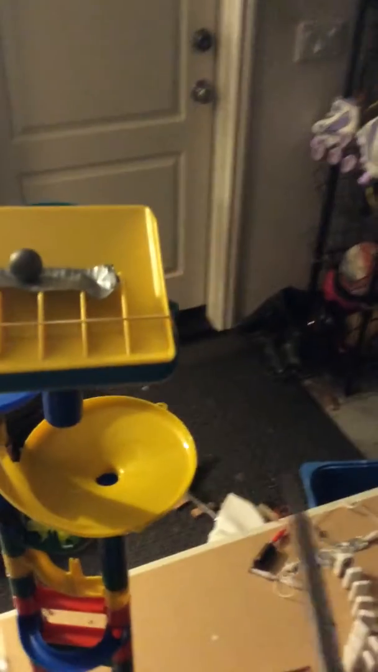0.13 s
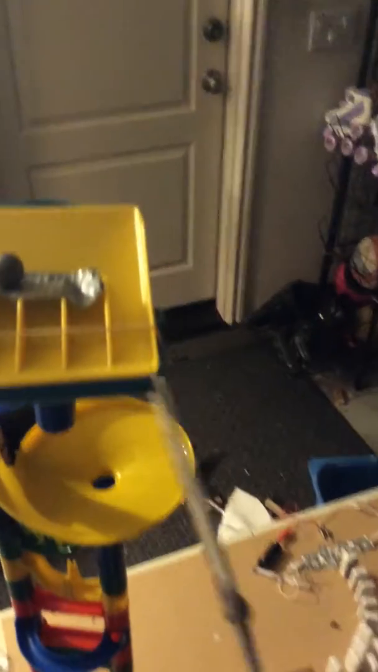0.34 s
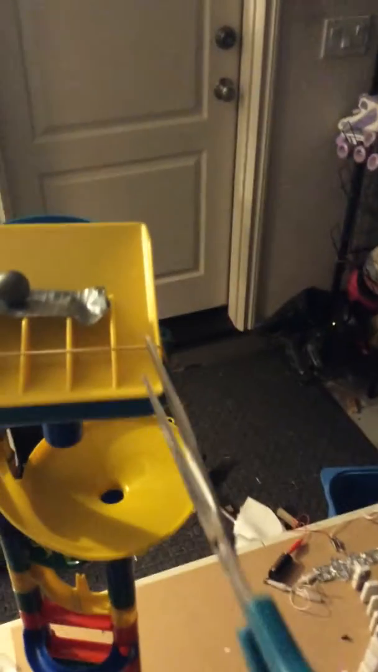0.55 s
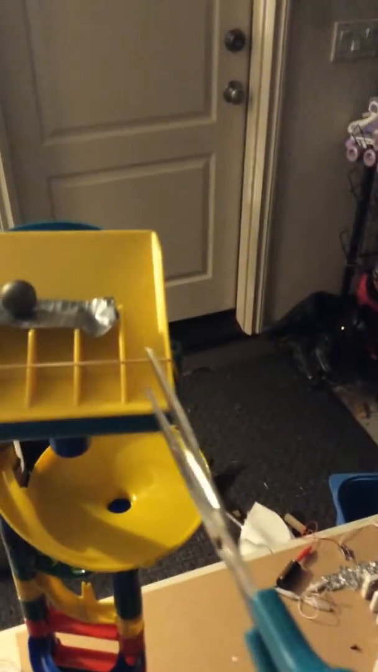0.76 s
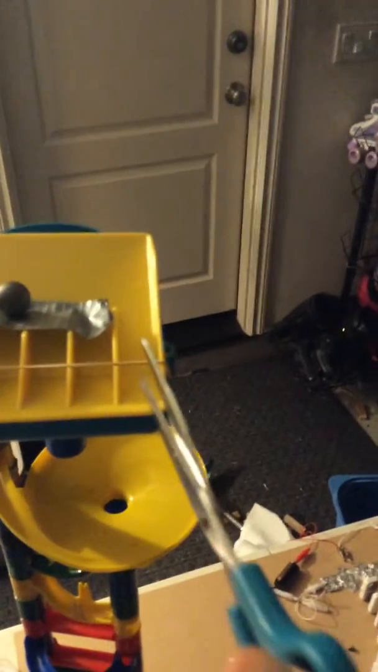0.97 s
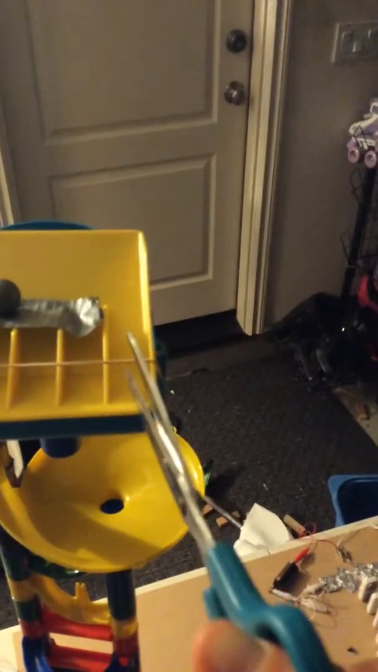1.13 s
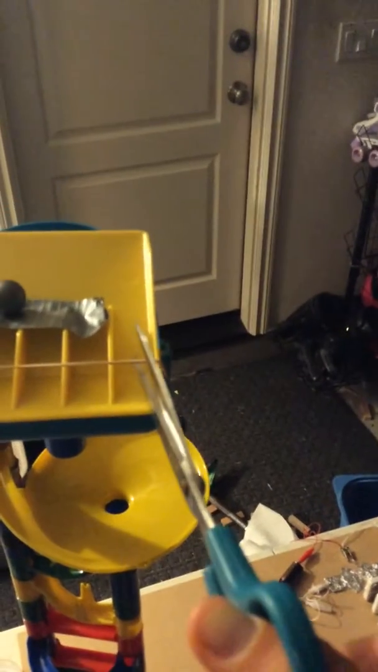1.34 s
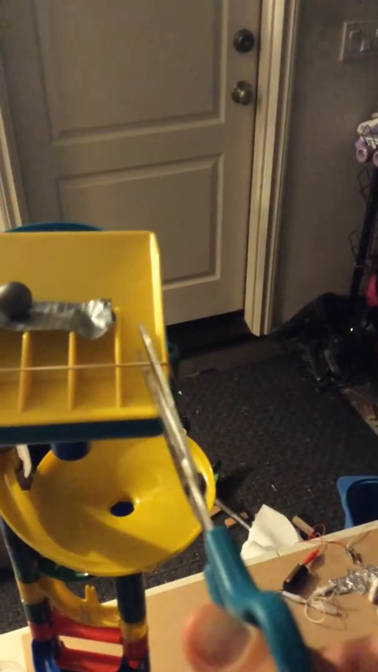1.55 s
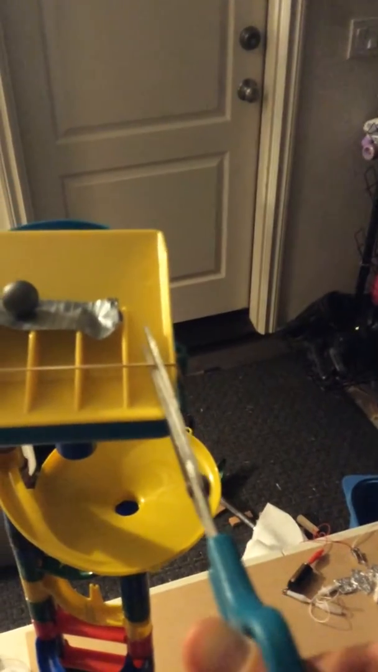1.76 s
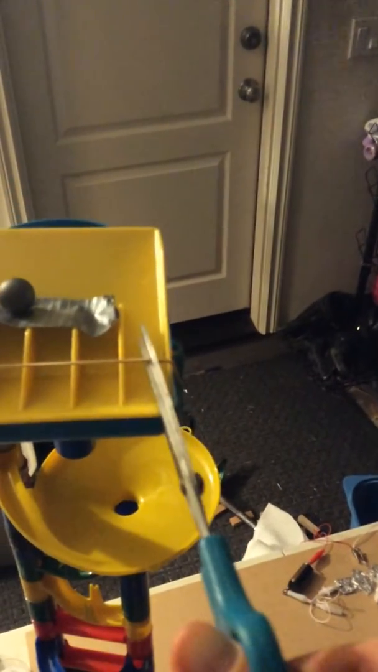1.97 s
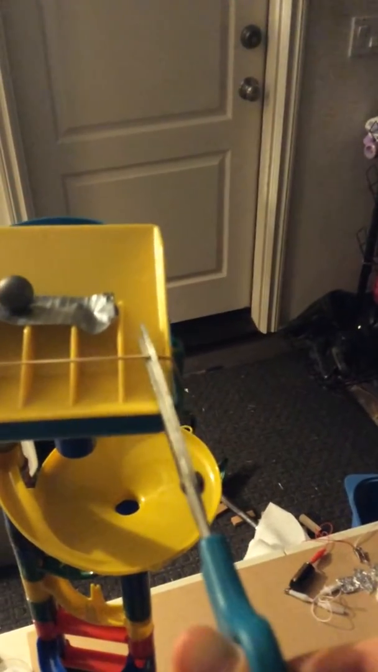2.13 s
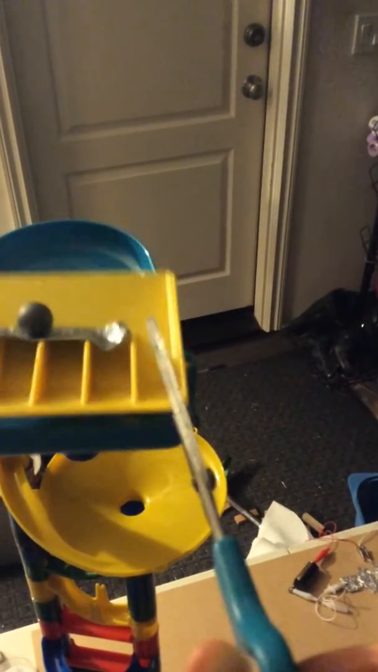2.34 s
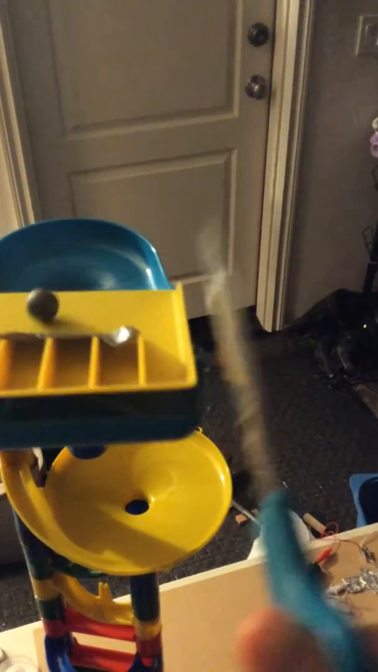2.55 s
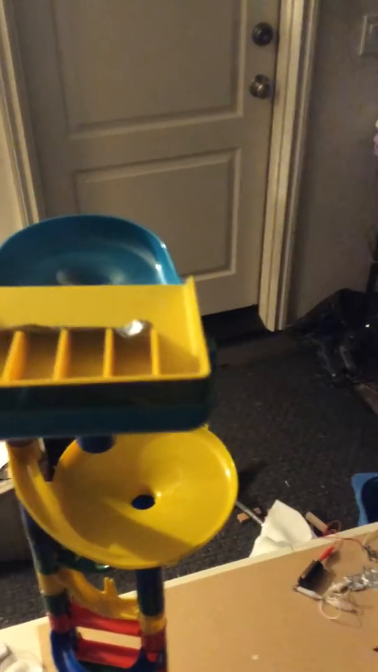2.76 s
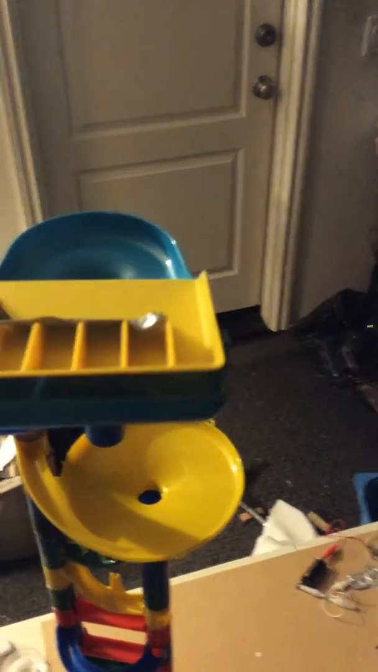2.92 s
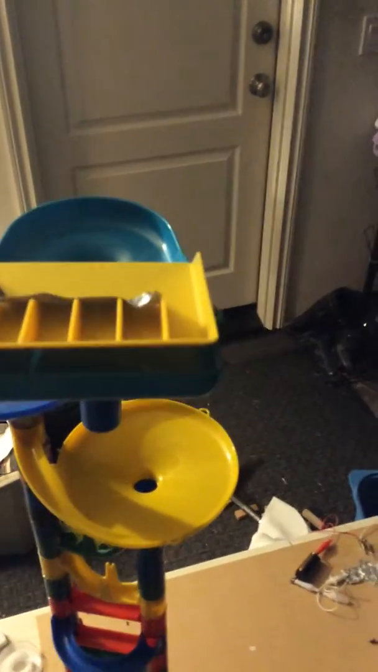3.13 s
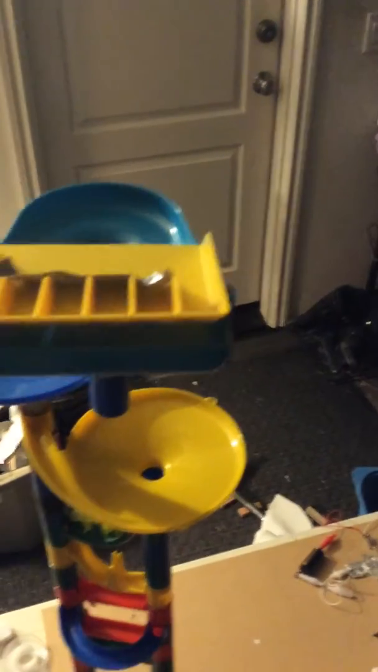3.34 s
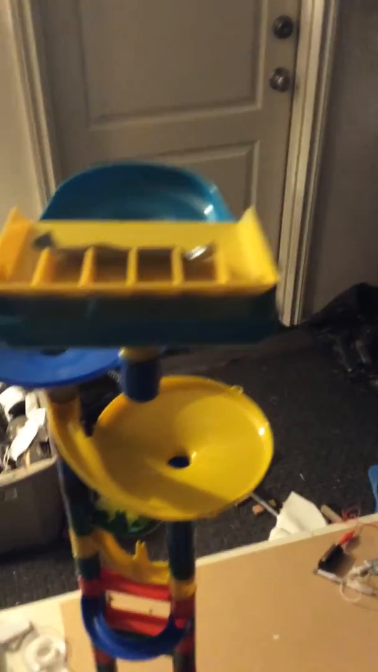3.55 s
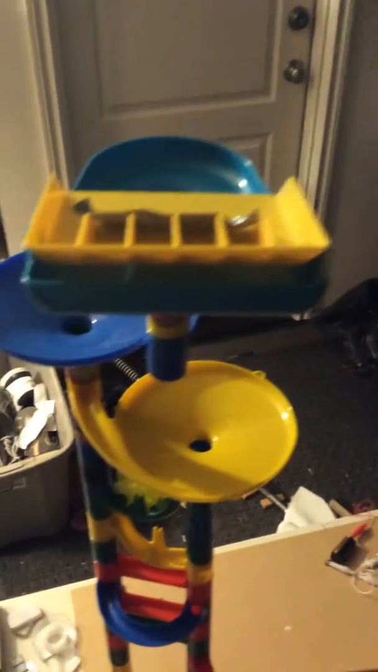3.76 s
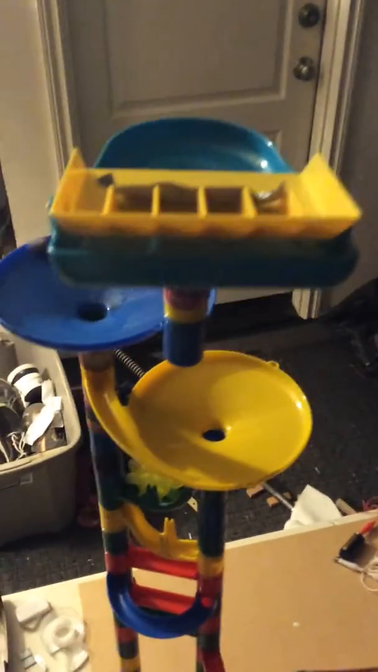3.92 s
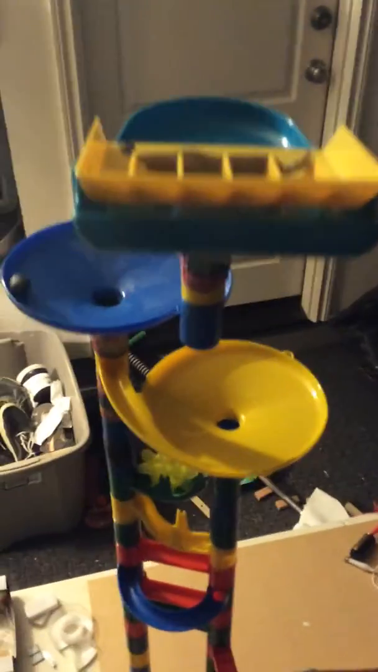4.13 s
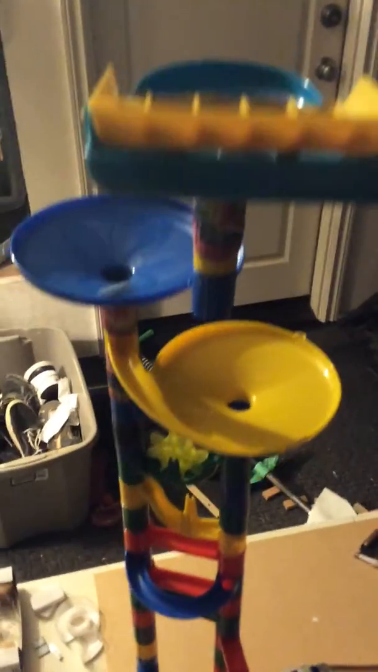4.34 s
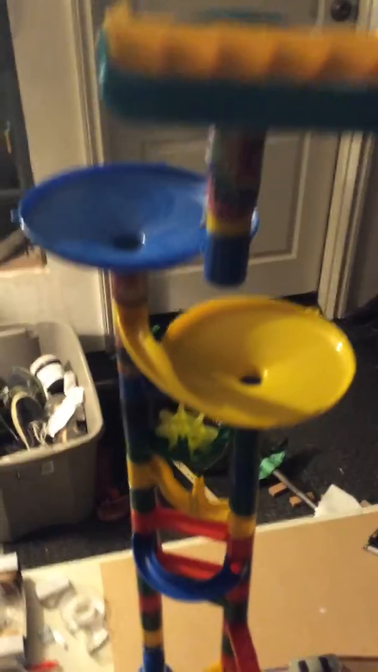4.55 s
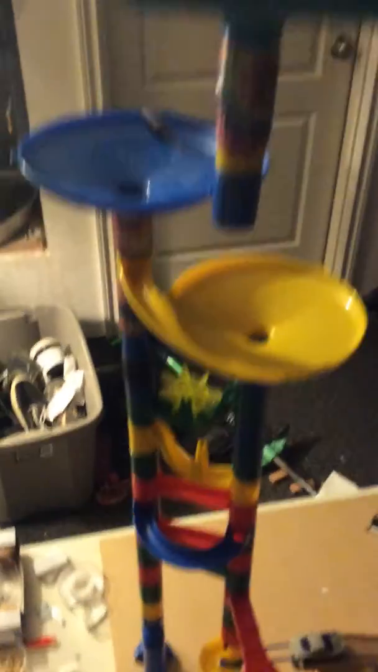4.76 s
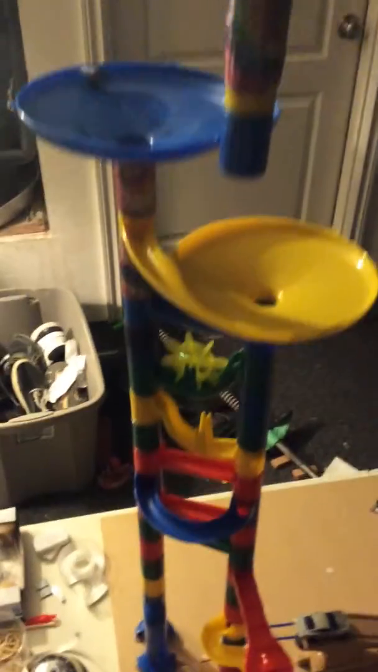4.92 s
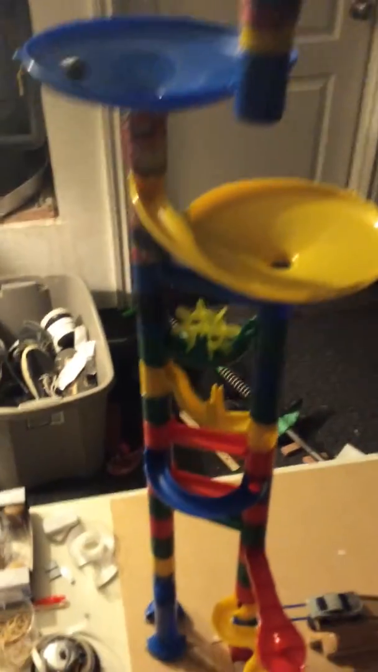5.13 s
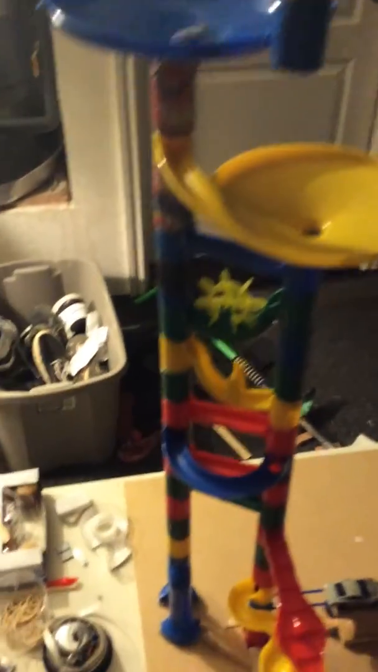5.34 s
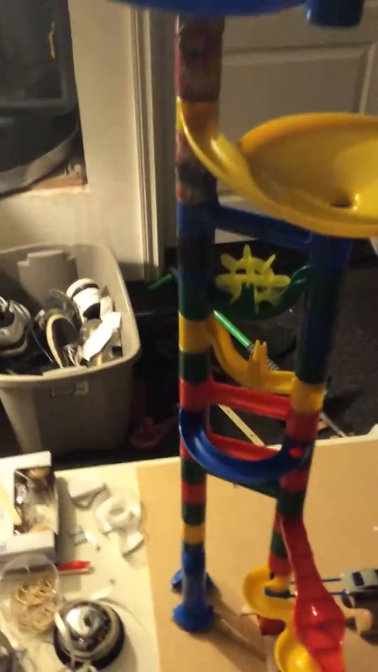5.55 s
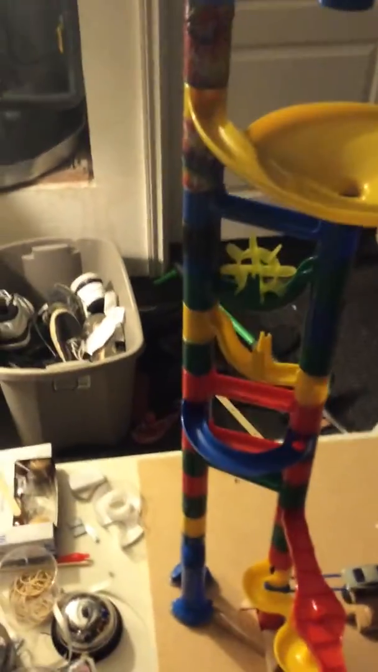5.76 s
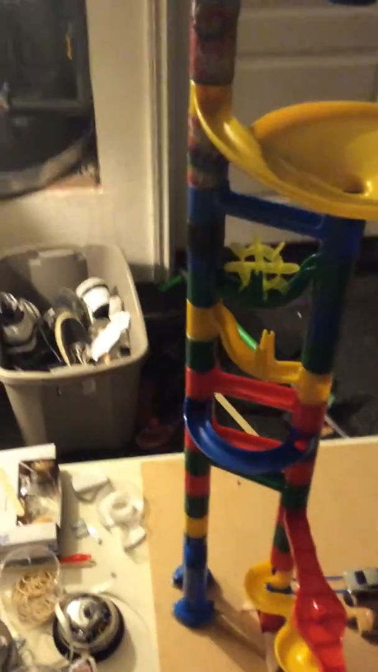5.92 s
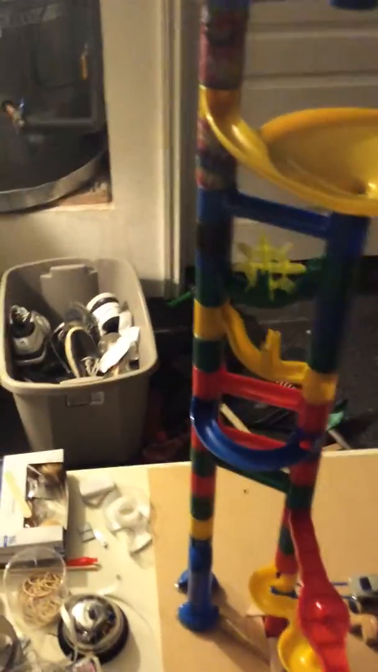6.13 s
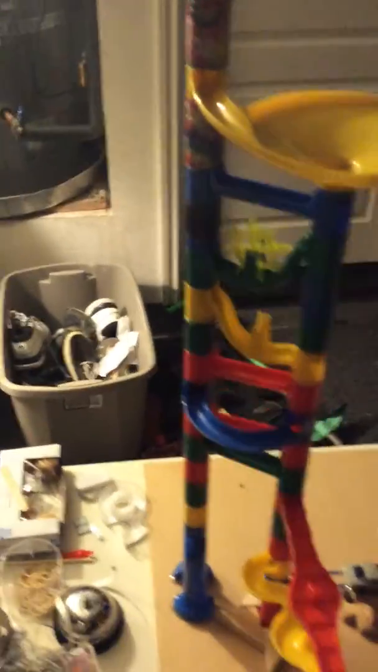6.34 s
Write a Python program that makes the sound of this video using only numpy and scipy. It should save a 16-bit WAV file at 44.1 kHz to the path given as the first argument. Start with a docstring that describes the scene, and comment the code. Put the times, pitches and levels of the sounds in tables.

```python
"""A quiet furnished room, one microphone near a plastic marble tower. Scissors tick through a string, a
tray tips, and marbles clatter into a bowl, each hit ringing the thin plastic and a few shaking the table.
They rumble round the funnels and knock the tower down, duller and with more room as they get farther
off. Behind it all lie steady air, microphone hiss and the hum of an appliance."""
import sys
import numpy as np
from scipy import signal
from scipy.fft import rfft, irfft
from scipy.io import wavfile

SR = 44100
rng = np.random.default_rng(int(sys.argv[2]) if len(sys.argv) > 2 else 0)


def generate_wav(signal):
    """Clip the signal to [-1, 1] and save it as 16-bit WAV at the path in sys.argv[1]."""
    frames = np.transpose(np.atleast_2d(signal))
    scaled = np.clip(frames, -1, 1) * 32767
    pcm = np.round(scaled).astype(np.int16)
    wavfile.write(sys.argv[1], SR, pcm)


N = 286209

# knocks on plastic: start_s, strength_db, sharpness_db, weight_db, contact_ms
KNOCKS = [(1.49, -49.5, -13, -2.5, 4.2), (1.632, -58.5, -15.5, -9, 2.4), (2.058, -64.5, -24, -9, 2.7),
          (2.278, -27.5, -19, -34, 0.85), (2.2819, -16, 6, -20.5, 4.35), (2.4765, -33.5, 9.5, -34, 2.9),
          (2.4817, -31.5, -2, -25, 1.6), (2.4967, -29, -19, -16.5, 3.4), (2.5122, -48.5, 3, -10, 1.1),
          (2.5513, -35, 0.5, -4.5, 3.8), (2.692, -56, -1.5, -6.5, 6.2), (2.846, -14.5, -0.5, -19.5, 2.3),
          (2.879, -20.5, 4, -24.5, 1.1), (2.891, -24, 3.5, -29, 2.6), (2.9, -16, -2, -16, 6.2),
          (2.925, -37, -1, -16, 4), (2.9652, -37.5, 3.5, -6, 1.8), (2.9771, -16.5, -8, -21, 2.24),
          (3.005, -22, -4.5, -33.5, 4), (3.025, -32, -4, -15, 4.9), (3.0397, -32.5, 0, -16, 1.03),
          (3.0656, -15, -8, -19, 3.7), (3.079, -27, 1, -5, 2.7), (3.086, -32.5, 2, -16, 1.8),
          (3.1022, -35, 4.5, -15, 1.3), (3.1069, -17.5, -15, -21, 5.2), (3.115, -22, 2.5, -41, 3.3),
          (3.1278, -27, -15, -14, 1.9), (3.148, -22.5, -2.5, -17.5, 2.55), (3.1643, -26, -16, -24, 2.1),
          (3.19, -49, 4, -14, 1.3), (3.2716, -53.5, -19, -13.5, 1.1), (3.5229, -57.5, -4, -2, 1.65),
          (3.5558, -51, -13.5, -18, 2.2), (3.6191, -42, -16.5, -26, 3.6), (3.7641, -42, -22, -24.5, 3.6),
          (3.9953, -38.5, -5.5, -16, 3.1), (4.916, -67.5, 8, -8, 2.5), (5.395, -53, 3, -7, 4.5),
          (5.436, -44, -7.5, -8, 3.9), (5.596, -34, 2, -15, 2.7), (5.624, -39.5, 0.5, -9, 3.2),
          (6.011, -58, 0.5, -7, 2.8), (6.186, -57.5, -2, -8.5, 3.3), (6.3807, -55.5, 1, -15, 1.1),
          (6.404, -40.5, -4.5, -10, 4.8), (6.4446, -39, -6, -7, 3.7), (6.4585, -43, -18, -10, 1.7)]
# modes of the struck plastic, low family to high: pitch_hz, relative_db, t60_s
THUD_MODES = [(235, -8, 0.027), (309.7, 3, 0.025), (508, -6, 0.089), (630, 0, 0.04)]
PANEL_MODES = [(880, -14, 0.06), (1090, -1.5, 0.02), (1136, -3.5, 0.025), (1266, -8, .05),
               (1388.5, -8.5, 0.038), (1456, -6.5, .05), (1548, -4, .04), (1780, -9.5, 0.045)]
WALL_MODES = [(2124, -8.5, 0.027), (2430, -7, 0.012), (2712, -8, .02), (2765, -11.5, 0.036),
              (2950, -12.5, 0.028), (3232, -3.5, 0.019), (3620, -2.5, 0.0095)]
RIM_MODES = [(3800, -7, .01), (4040, -4, .014), (4300, -5, .012), (4700, -8, .008), (6200, -9, .006)]
# a sharper knock lifts wall, rim and crack over the panel: offset_db, share_of_sharpness
WALL_LIFT, RIM_LIFT, CRACK_LIFT = (2.5, 0.81), (.6, 1.4), (-2.5, 1.58)
# marbles rolling over the tray, then round the funnels: time_s, funnel_db, belly_over_funnel_db
ROLL_LEVELS = [(2.55, -78, 8), (2.82, -69, -2), (3.3, -76, -2), (3.36, -72.5, -3), (3.56, -53.5, -8),
               (3.77, -47, -12), (3.82, -52.5, -6), (3.885, -46, -14.5), (4.055, -56.5, -6.5),
               (4.095, -46, -14.5), (4.16, -57.5, 4), (4.29, -52, -11.5), (4.505, -53.5, -3.5),
               (4.54, -46, -18), (4.6, -59, 1.5), (4.91, -57, -5.5), (5.2, -65, 1), (5.55, -64, 5),
               (5.93, -73, 7), (6.02, -68, 0), (6.2, -56.5, -10), (6.33, -72, 10.5)]
# their rumble carried by the tower's tubes and chutes: time_s, base_level_db
TOWER_LEVELS = [(2.55, -68), (2.82, -77.5), (3.44, -85), (3.625, -66), (3.68, -66), (3.77, -61),
                (4.05, -67), (4.4, -66), (4.745, -65), (5.045, -74.5), (5.16, -60.5), (5.4, -65),
                (5.53, -71.5), (5.94, -77), (6.015, -66), (6.22, -59), (6.365, -77.5)]
# resonances under the rolling: pitch_hz, width_hz, relative_db
FUNNEL_MODES = [(1145, 75, -3), (1270, 21, 6.5), (1444.6, 86, 2), (1570, 190, -5), (1541, 62, -1),
                (1566, 38, -5)]
BELLY_MODES = [(501, 24, 1.5), (591, 31, 2.5), (672, 58, 2), (803.4, 28.4, 3.5), (912, 24, 2),
               (1017, 53, -7)]
TUBE_MODES = [(188, 36, -5.5), (281, 34, 7), (416, 300, -0.5)]
CHUTE_MODES = [(1624, 250, 9), (1760, 20, 1.5), (1922, 75, -2.5), (2164, 670, -18.5)]
GRIT_MODES = [(2314, 16, -1.5), (2685, 243, 4), (2790, 306, 4.5), (2920, 334, -1.5), (3353, 170, -3.5),
              (3480, 600, -10), (4210, 560, -10), (5470, 440, -17)]
# falling marbles shake the table top: start_s, peak_db, pitch_hz
TABLE_THUMPS = [(2.5537, -43.5, 175), (3.19, -52, 124), (5.598, -46.5, 149)]
# ticks of the scissor blades: start_s, peak_db, pitch_hz
BLADE_TICKS = [(.487, -55, 13900), (.487, -66, 5500)]
# a bright rustle just before the cut: time_s, level_db
RUSTLE_LEVELS = [(0.27, -95), (0.302, -62.5), (0.36, -94)]
# spectrum of room air and microphone hiss: frequency_hz, relative_db
AIR_SPECTRUM = [(44, -36), (75, -7), (154, -9), (331, -9.5), (396, -3), (464, -13), (1460, -22),
                (2050, -29.5), (12900, -31.5), (14800, -33.5), (16200, -57)]
# appliance hum, mains tone first: pitch_hz, level_db, width_hz (for the mains tone, its rate of waver)
APPLIANCE_HUM = [(58.6, -69, 3), (118.5, -74, 3.5), (204.5, -73.5, 22), (275, -80.5, 45), (310, -83, 4.6),
                 (422, -78, 74)]
# decay of the room: frequency_hz, t60_s
ROOM_DECAY = [(150, 0.5), (1000, 0.26), (4000, 0.24), (15000, 0.16)]

LOWER_TOWER_S = 3.4   # from here the marbles are farther down: duller, with more room
ORBITS_PER_S, WALL_ECHO_MS, WALL_SWING_MS, WALL_ECHO_DB = 2.2, 0.702, 0.37, -6
ROOM_DB, FAR_ROOM_BOOST_DB, AIR_DB = -8, 1.5, -70.5
TIME_S = np.arange(N) / SR


def plastic_knocks():
    """A first touch and a short chatter of force ring the modes; each knock meets another spot or piece."""
    start_s, strength_db, sharpness_db, weight_db, contact_ms = np.transpose(KNOCKS)[:, :, None]
    wall_db, rim_db, crack_db = (strength_db + offset_db + share * sharpness_db
                                 for offset_db, share in (WALL_LIFT, RIM_LIFT, CRACK_LIFT))
    t, force_len = np.arange(SR // 8) / SR, 900
    contacts_elapsed = 1000 * t[:force_len] / contact_ms
    chatter = rng.standard_normal((len(KNOCKS), force_len)) * np.exp(-contacts_elapsed)
    chatter *= 1 - np.exp(-4 * contacts_elapsed)   # the force builds up first
    chatter /= np.sqrt(np.sum(chatter ** 2, axis=1, keepdims=True))
    touch = (np.arange(force_len) == 0) / contact_ms   # a brief contact is mostly one sharp touch
    spots = iter(rng.standard_normal((len(KNOCKS), 3, 30)).T[..., None])   # chance per mode and knock
    ringing = 0
    for modes, level_db in ((THUD_MODES, strength_db + weight_db), (PANEL_MODES, strength_db),
                            (WALL_MODES, wall_db), (RIM_MODES, rim_db)):
        family = 0
        for hz, mode_db, t60 in modes:
            louder, polarity, detune = next(spots)
            gain = amp(level_db + mode_db - 4 + 0.5 * louder) * np.sign(polarity)
            family += gain * amp(-60 * t / t60) * np.sin(2 * np.pi * hz * (1 + .02 * detune) * t)
        ringing += high_pass(family, .8 * modes[0][0], order=5)   # little radiates below the modes
    knocks = signal.fftconvolve(ringing, chatter + 3.78 * touch, axes=1)
    # the contact itself radiates a broad crack
    crack = high_pass(amp(crack_db + 19) * (chatter + .3 * touch), 4800, order=4)
    far_crack = signal.sosfilt(signal.butter(2, 9000, fs=SR, output="sos"), crack)
    knocks[:, :force_len] += np.where(start_s > LOWER_TOWER_S, far_crack, crack)
    out = np.zeros(N + knocks.shape[1])
    np.add.at(out, (start_s * SR).round().astype(int) + np.arange(knocks.shape[1]), knocks)
    return out[:N]


def rolling_marbles():
    """Surface bumps under the marbles shake funnel, belly, tubes and chutes, with a fine grit on top."""
    funnel_db, belly_over_db = in_time(ROLL_LEVELS)
    tower_db, = in_time(TOWER_LEVELS)
    tube_db = tower_db - 7 + 3 * (TIME_S - LOWER_TOWER_S)   # the tubes take over on the way down
    grit_db = -72.5 + 0.52 * (tower_db + 68)   # follows about half of the tower's swing
    bumps = rng.standard_normal(N) * amp(2.2 * drift(60))
    fizz = rms_one(high_pass(bumps, 2700) - high_pass(bumps, 7000))
    grit = shaken_plastic(bumps, GRIT_MODES) + amp(-6) * fizz
    rumble = (amp(funnel_db) * shaken_plastic(bumps, FUNNEL_MODES, swell_db=5.5)
              + amp(funnel_db + belly_over_db) * shaken_plastic(bumps, BELLY_MODES, swell_db=1)
              + amp(tube_db) * shaken_plastic(bumps, TUBE_MODES, swell_db=-2.5)
              + amp(tower_db + 1) * shaken_plastic(bumps, CHUTE_MODES)
              + amp(grit_db) * grit)
    rumble *= TIME_S > ROLL_LEVELS[0][0]
    return rumble + funnel_wall_echo(rumble)


def shaken_plastic(bumps, modes, swell_db=0):
    """A circling marble crosses the nodes, so each mode swells on its own, here by chance; rms 1."""
    body = 0
    for k, (hz, width_hz, mode_db) in enumerate(modes):
        gain = (-1) ** k * amp(mode_db + swell_db * drift(7.4)) * np.sqrt(width_hz)
        body += gain * resonate(bumps, hz, width_hz)
    return rms_one(high_pass(body, 1.05 * modes[0][0]))


def funnel_wall_echo(rumble):
    """The path by way of the wall lengthens and shortens on each round, so the colour glides."""
    angle = 2 * np.pi * np.cumsum(ORBITS_PER_S * (1 + 0.267 * drift(0.51))) / SR
    lag_ms = WALL_ECHO_MS + WALL_SWING_MS * np.sin(angle)
    return amp(WALL_ECHO_DB) * np.interp(TIME_S - lag_ms / 1000, TIME_S, rumble)


def table_top():
    """A marble's fall sets the table ringing with a short low boom."""
    return sum(ring(click(s, db), hz, t60=0.088) for s, db, hz in TABLE_THUMPS)


def scissors():
    """A short rustle of dense grains, then the faint ringing tick of the blades."""
    ticks = sum(ring(click(s, db), hz, t60=.012) for s, db, hz in BLADE_TICKS)
    grains = rng.standard_normal(N) * amp(4.5 * drift(150))
    rustle_db, = in_time(RUSTLE_LEVELS)
    rustling = (TIME_S > RUSTLE_LEVELS[0][0]) & (TIME_S < RUSTLE_LEVELS[-1][0])
    return ticks + rustling * amp(rustle_db) * rms_one(high_pass(grains, 3500))


def room_reflections(x):
    """Dense reflections: octave bands of noise, each dying at its own rate, rising within a few ms."""
    t, tail = np.arange(SR // 2) / SR, 0
    for low_hz in 90 * 2. ** np.arange(8):
        octave = signal.butter(2, [low_hz, min(2 * low_hz, .45 * SR)], "band", fs=SR, output="sos")
        band = signal.sosfilt(octave, rng.standard_normal(len(t)))
        tail += band * amp(-60 * t / at_hz(ROOM_DECAY, low_hz * np.sqrt(2)))
    tail *= np.clip((t - .001) / .003, 0, 1)
    return signal.fftconvolve(x, tail / np.sqrt(np.sum(tail ** 2)))[:N]


def room_tone():
    """Steady air and microphone hiss, with an appliance's wavering hum in the background."""
    bins_hz = np.maximum(np.fft.rfftfreq(N, 1 / SR), 1)
    air = rms_one(irfft(rfft(rng.standard_normal(N)) * amp(at_hz(AIR_SPECTRUM, bins_hz)), N))
    (mains_hz, mains_db, waver_hz), *buzz_bands = APPLIANCE_HUM
    mains = np.sqrt(2) * amp(mains_db + 1.2 * drift(waver_hz)) * np.sin(2 * np.pi * mains_hz * TIME_S)
    buzz = sum(amp(db) * resonate(rng.standard_normal(N), hz, width) for hz, db, width in buzz_bands)
    return amp(AIR_DB) * air + mains + buzz


def amp(db):
    """Gain of a level in dB."""
    return 10 ** (np.asarray(db) / 20)


def rms_one(x):
    """Scale to rms 1."""
    return x / np.sqrt(np.mean(x ** 2) + 1e-30)


def in_time(rows):
    """Columns of a curve table at every sample."""
    time_s, *columns = np.transpose(rows)
    return [np.interp(TIME_S, time_s, column) for column in columns]


def at_hz(rows, hz):
    """Read a table of frequency_hz, value on a log-frequency axis."""
    frequency_hz, values = np.transpose(rows)
    return np.interp(np.log(hz), np.log(frequency_hz), values)


def drift(rate_hz):
    """Smooth random wander with spread 1."""
    hop, settle = 40, 2000
    pole = np.exp(-2 * np.pi * rate_hz * hop / SR)
    noise = rng.standard_normal(N // hop + settle + 2)
    slow = signal.lfilter([1], [1, -2 * pole, pole * pole], noise)[settle:]
    return np.interp(np.arange(N) / hop, np.arange(len(slow)), rms_one(slow))


def click(start_s, peak_db):
    """A push one sample long."""
    return amp(peak_db) * (np.arange(N) == round(start_s * SR))


def ring(x, hz, t60):
    """One mode: a unit click starts a sine of height 1 that falls 60 dB in t60 seconds."""
    r, w = amp(-60 / (t60 * SR)), 2 * np.pi * hz / SR
    return signal.lfilter([0, np.sin(w)], [1, -2 * r * np.cos(w), r * r], x + 1e-18)


def resonate(x, hz, width_hz):
    """Resonance of the given width, rms 1."""
    return rms_one(ring(x, hz, t60=np.log(1000) / (np.pi * width_hz)))


def high_pass(x, hz, order=2):
    """Butterworth high-pass."""
    return signal.sosfilt(signal.butter(order, hz, "high", fs=SR, output="sos"), x)


def scene():
    """At the microphone, in mono: direct sound, its reflections and the room tone."""
    direct = plastic_knocks() + table_top() + scissors() + rolling_marbles()
    reflected_db = ROOM_DB + FAR_ROOM_BOOST_DB * (TIME_S > LOWER_TOWER_S)
    return (direct + room_reflections(amp(reflected_db) * direct) + room_tone())[None]


def record(dry):
    """The recorder rounds the loudest peaks and cuts the top at 16.1 kHz."""
    rounded = .9 * np.tanh(dry / .9)
    return signal.sosfilt(signal.cheby2(12, 60, 16100, fs=SR, output="sos"), rounded)


dry = scene()
out = record(dry)
generate_wav(out)
```